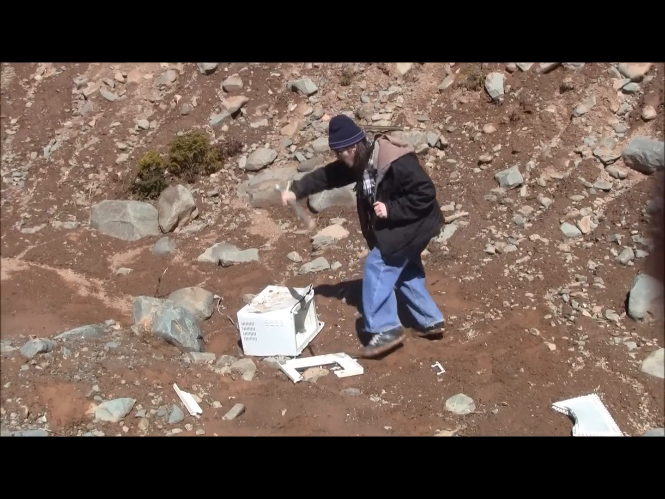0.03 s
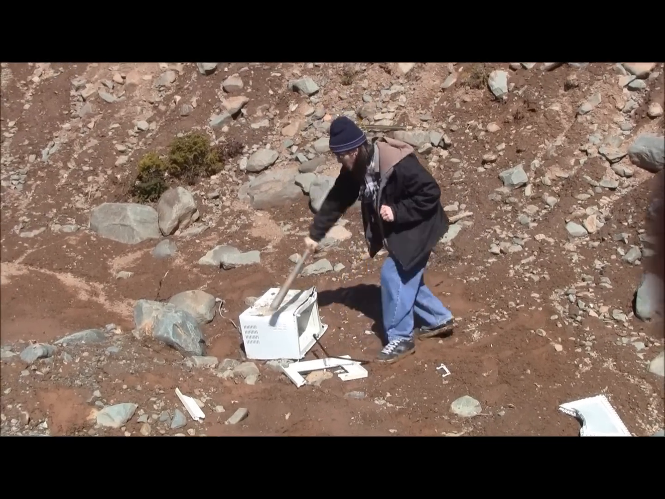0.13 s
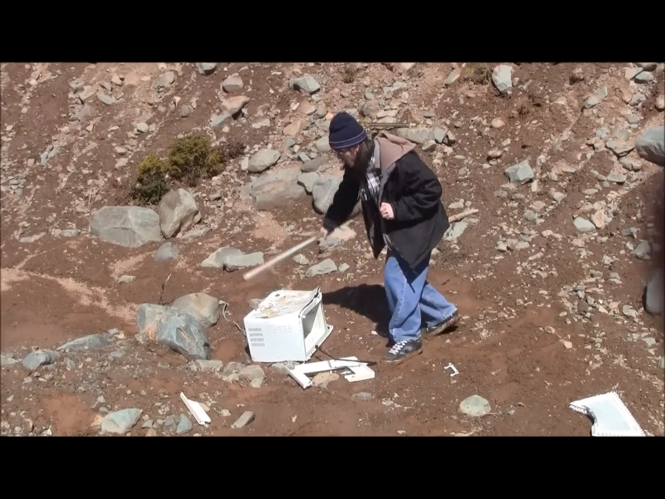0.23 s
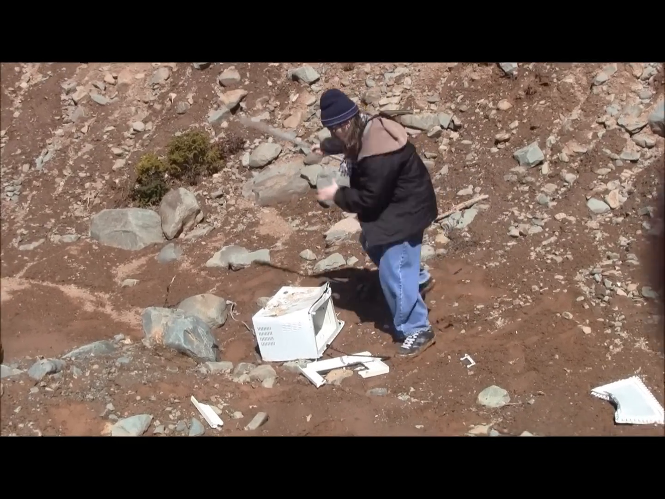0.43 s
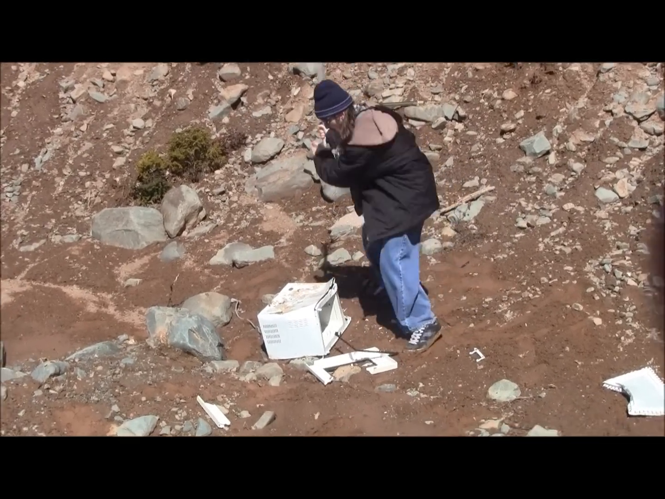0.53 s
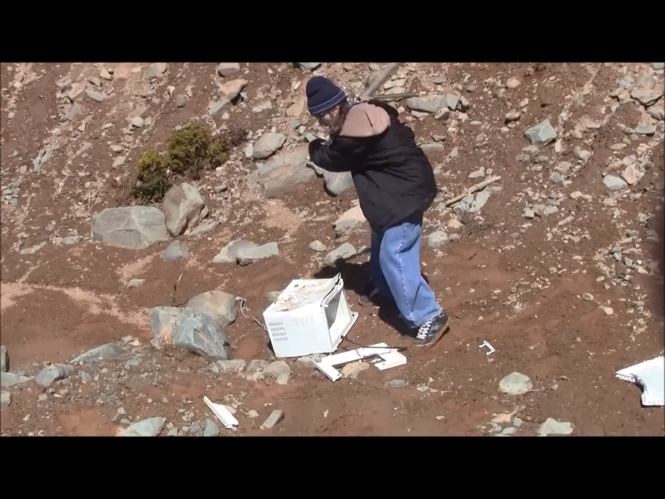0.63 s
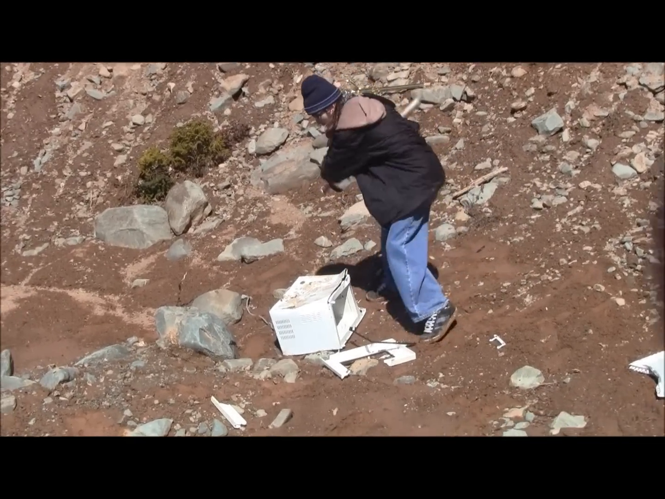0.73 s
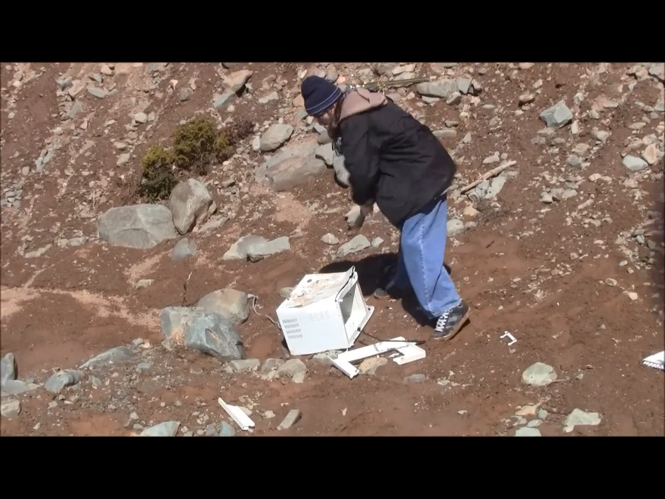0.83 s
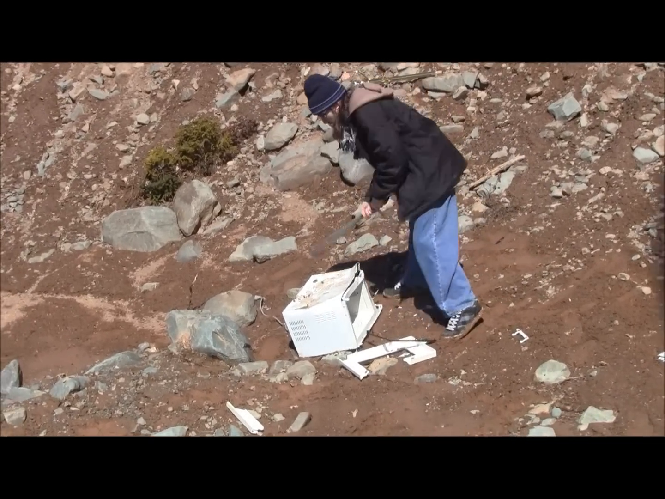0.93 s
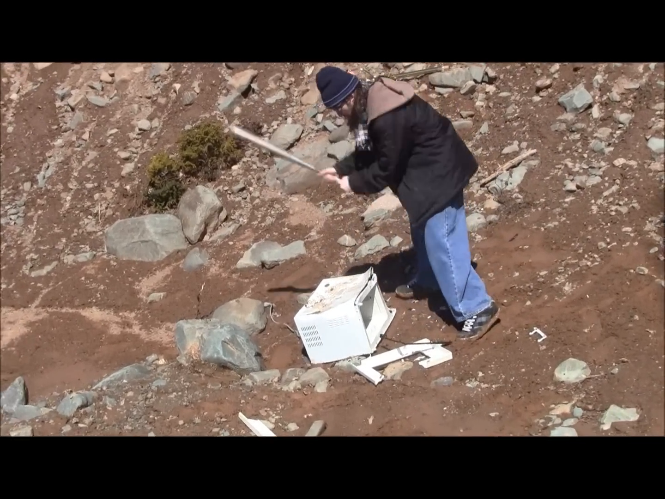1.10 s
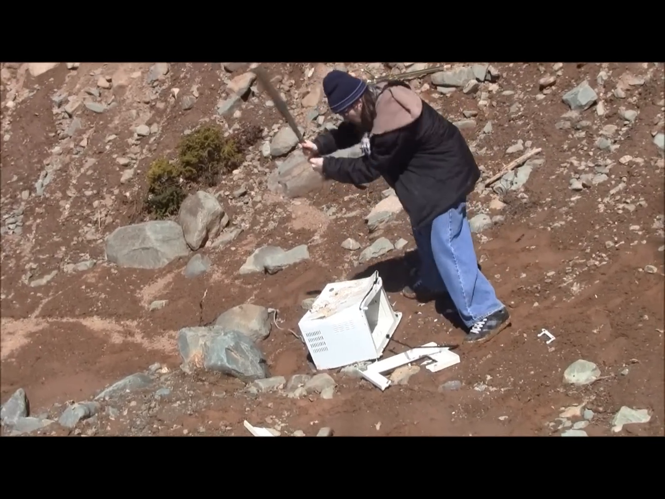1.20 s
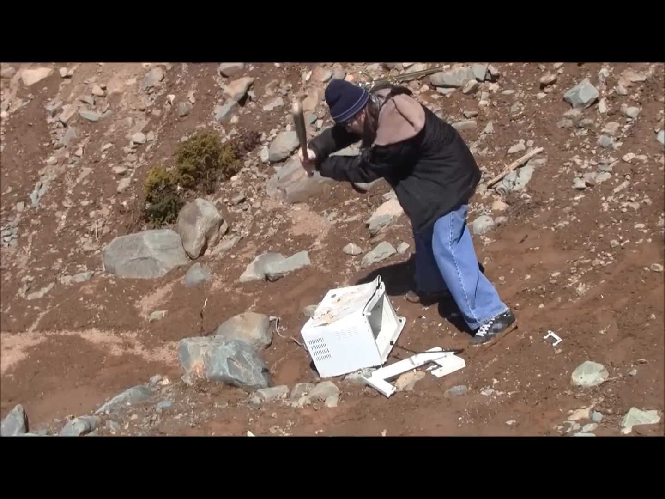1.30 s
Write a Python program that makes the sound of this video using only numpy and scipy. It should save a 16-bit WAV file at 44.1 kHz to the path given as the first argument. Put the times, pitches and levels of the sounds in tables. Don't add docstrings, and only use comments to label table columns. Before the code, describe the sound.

A hammer hits a hollow sheet-metal casing twice on open rocky ground, miked close. Boots scuff gravel and a stone knocks at 0.1 s. At 0.2 s a dull, clipped clang crashes with quick rebounds; the casing booms and rocks until about 0.45 s, then faint gravel and air. At 0.93 s a sharper crack booms and rattles, small parts tinkling from 1.02 s, fading by 1.35 s with another scuff at 1.25 s.

```python
import sys
import numpy as np
from scipy import signal
from scipy.io import wavfile

SR = 44100
rng = np.random.default_rng(int(sys.argv[2]) if len(sys.argv) > 2 else 0)


def boost_factor(decibels):
    exponent = np.asarray(decibels, float) / 20
    return 10 ** exponent


def wrap_up_sound(samples):
    columns = np.atleast_2d(samples).T
    tamed = np.clip(columns, -1, 1)
    steps = np.round(tamed * 32767).astype(np.int16)
    wavfile.write(sys.argv[1], SR, steps)


N = 59535

# (frequency [Hz], density [dB per Hz])
AIR_SPECTRUM = [(25, -33), (100, -12.5), (270, -2), (900, -5), (1300, -5.5), (3200, -21.5), (9700, -34.5),
                (13000, -25.5), (16000, -79)]
AIR_DB = -48.5
# (frequency [Hz], side minus mid [dB])
NEAR_SIDE = [(60, -38), (240, -11), (950, -19.5), (3770, -24), (6500, -17), (9000, -10), (15000, -2)]
AIR_SIDE = [(60, -33), (240, -5.5), (950, -7.5), (3770, -10), (15000, -9)]
LEFT_DB = -1.28

# (time [s], rise [s], t60 [s], level [dB], tilt [dB per octave])
SCUFFS = [(0.0, 0.0011, 0.068, -52, -1.5), (0.068, .004, .1, -50, 4), (0.129, .003, 0.23, -41.5, -1),
          (0.168, .006, 0.037, -50, -2), (0.187, 0.00091, 0.024, -49, -4), (0.379, 0.0022, 0.13, -47, 3),
          (0.438, 0.03, 0.2, -51, 6), (0.615, 0.015, 0.092, -53.5, 2.5), (0.657, .001, .02, -53, -4),
          (0.745, .01, 0.065, -61.5, 9), (0.850, .003, 0.75, -57.5, 4.5), (0.863, .006, .05, -62, -1),
          (1.2538, 0.0038, 0.15, -44, -3.5)]
# (frequency [Hz], density [dB per Hz])
GRAVEL_SPECTRUM = [(500, 0), (1200, 1), (3000, 0), (6000, -12.5), (9500, -7.5), (13000, -22.5),
                   (16000, -39)]
GRAINS_PER_S, GRAIN_SPREAD_DB = 12000, 2
# (frequency [Hz], density [dB per Hz])
STONE_SPECTRUM = [(88, -9), (150, -5.5), (923, -13), (1390, -0.5), (1870, -8), (4320, -6.5), (6910, -17),
                  (8900, -7), (16000, -41)]
STONE_S, STONE_DB, STONE_T60_S = 0.0958, -23.5, 0.042
STONE_HZ = (614, 1360, 3300, 4300, 8590, 8980)
STONE_RING_DB, STONE_RING_T60_S = -34, 0.045

# (time [s], wall boom [dB], rattle [dB], base boom [dB])
ROCK_ONE = [
    (0.209, -42, -26, -38),
    (0.252, -35.5, -38, -47),
    (0.293, -24.5, -40.5, -27),
    (0.336, -32.5, -44.5, -30),
    (0.378, -36, -60, -54),
    (0.418, -47.5, -60, -35),
    (0.552, -53.5, -64, -56),
    (0.662, -62, -61.5, -85),
]
ROCK_TWO = [
    (0.944, -41, -30.5, -44),
    (1.001, -26.5, -45, -38),
    (1.05, -33, -37, -30.5),
    (1.07, -31.5, -38, -21),
    (1.099, -31, -38.5, -46.5),
    (1.153, -39.5, -44.5, -28),
    (1.18, -44.5, -49, -42),
    (1.25, -45, -61.5, -48),
    (1.35, -63, -86, -59),
]
# (frequency [Hz], level [dB], t60 [s])
WALL_MODES = [(433, 0, 0.055), (452.6, -7.5, 0.117), (502, 5.5, 0.054), (558, -4.5, 0.17),
              (588.5, 2.5, 0.047), (657, -4, 0.2), (721.5, -3.5, 0.063), (848, -7.5, 0.038)]
# (frequency [Hz], level [dB], t60 [s])
BASE_MODES = [(121, -6, 0.3), (178, 0.5, 0.065), (241, -3, 0.16)]
WALL_DB, BASE_DB = -2.5, -8
KNOCKS_PER_S, KNOCK_SPREAD_DB = 500, 2
# (time [s], level [dB], frequency [Hz], t60 [s], share sharp at first [1])
LANDINGS = [(.286, -22, 520, .12, 0), (.316, -27, 505, .1, 0), (.336, -24, 516, .24, .09),
            (.422, -40, 515, .7, 0), (.983, -23, 710, .07, 0), (1.015, -23, 580, .08, 0),
            (1.059, -24, 595, .09, 0), (1.058, -26, 500, .1, 0), (1.08, -29, 450, .15, 0),
            (1.13, -29, 520, .1, 0), (1.146, -27, 535, .12, 0), (1.205, -37, 540, .1, 0),
            (1.235, -42, 575, .45, 0), (.208, -26, 213, .2, 0), (.932, -25, 185, .15, 0),
            (.972, -27, 226, .25, 0), (1.03, -25, 219, .25, 0), (1.085, -30, 204, .15, 0)]
LANDING_RISE_S, SAG_S = 0.0049, .03
# (time [s], level [dB])
SETTLES = [
    (.298, -34),
    (1.117, -36),
]
PAIR_HZ, BEAT_HZ, PAIR_T60_S = 207, 9.8, 1.2
# (frequency [Hz], density [dB per Hz])
RATTLE_SPECTRUM = [(410, -55), (700, -43), (882, 8), (4060, -4.5), (4380, -6), (6860, -13.5), (7800, -5),
                   (15000, -29)]
RATTLE_DB, RATTLE_CLICKS_PER_S, RATTLE_SPREAD_DB = 6, 7000, 2
SCREW_HZ = (3650, 3700, 4320, 4400, 4460, 5040, 5910, 6340, 9190, 9700)
SCREW_T60_S, SCREW_HITS_PER_S, SCREW_DB = .07, 110, -13
# (time [s], frequency [Hz], level [dB], t60 [s])
TINKLES = [(1.024, 7600, -41, .07), (1.044, 9700, -42, .05), (1.072, 9190, -42, .07),
           (1.070, 4450, -35, .09), (1.09, 5040, -40, .08), (1.075, 7690, -32, .11),
           (1.088, 5910, -44, .12), (1.100, 11900, -49, .08), (1.139, 7800, -41, .035),
           (1.140, 9600, -44, .08), (1.160, 7850, -48, .04), (1.162, 3680, -46, .14),
           (1.095, 3690, -42, .12), (1.307, 4300, -64, .12), (1.02, 4410, -43, .15),
           (1.045, 4400, -41, .12), (1.115, 4330, -44, .25)]
TINKLE_DB = 5

# (time [s], peak [dB], clang [Hz], clang t60 [s], crack [dB])
BLOWS = [
    (0.2047, 0, 1300, .015, -14),
    (0.9297, -1, 1520, .018, -6),
]
# (time [s], level [dB], clang [Hz],
# t60 [s])
REBOUNDS = [(0.2072, -6.5, 600, .03), (0.2096, -6.5, 1270, 0.017), (0.2053, -3, 1620, 0.022),
            (0.2134, -9.5, 636, 0.017), (0.223, -10, 1680, 0.03), (0.2253, -9.5, 580, 0.048),
            (0.2288, -12, 1080, 0.014), (0.2376, -9.5, 594, 0.01), (0.9289, -13, 850, .013),
            (0.9352, -15.5, 700, 0.011), (0.9449, -12, 1326, .015), (0.9610, -12, 690, 0.0099)]
# (frequency [Hz], level [dB], t60 [s])
PANEL_ONE = [(495, 2, .16), (556, -4, .3), (655, 1, .17), (945, -8, .15), (1110, -7, .2), (1265, -1, .1),
             (1455, 0, .1), (1545, -1, .09), (1705, 2, .14), (1840, -5, .2), (2030, -12, .1),
             (2153, -5, .09), (2444, -10, .15), (2910, -12, .12)]
# (frequency [Hz], level [dB], t60 [s])
PANEL_TWO = [(465, 4.5, 0.11), (530, -9, 0.16), (742, -6.5, 0.22), (820, -2, 0.17), (1023, -14.5, 0.25),
             (1283, -4, 0.18), (1420, -3, 0.2), (1725, 9.5, 0.055), (2105, -4, .08), (2226, -2, 0.084),
             (2342, -22, 0.049), (2800, -9, 0.13), (3430, 1.5, 0.027), (4312, -22, 0.18)]
# (frequency [Hz], density [dB per Hz])
CRASH_SPECTRUM = [(60, -53), (230, -15.5), (370, -12), (560, -2.5), (1500, 1), (3000, -4), (10400, -17.5),
                  (16000, -35)]
# (frequency [Hz], t60 [s])
CRASH_T60 = [(60, 0.3), (300, 0.79), (1000, 0.5), (3000, 0.22), (8000, 0.071), (15000, 0.25)]
PANEL_DB, CRASH_DB, CRACK_T60_S = -19.5, -18, .017

LOW_CUT_HZ, HIGH_CUT_HZ = 185, 16000
OVERLOAD_LEVEL = 1.0


def rms_one(x):
    return x / np.sqrt(np.mean(x ** 2) + 1e-20)


def at_hz(points, hz):
    table_hz, values = np.array(points).T
    return np.interp(np.log(hz), np.log(table_hz), values)


def burst(s, rise, t60):
    t = np.arange(N) / SR - s
    return np.clip(t / rise, 0, 1) * boost_factor(-60 * np.maximum(t - rise, 0) / t60)


def ring(s, hz, t60):
    t = np.maximum(np.arange(N) / SR - s, 0)
    return np.sin(2 * np.pi * hz * t) * np.exp(-np.log(1000) * t / t60)


def grains(rate, spread_db):
    size = boost_factor(spread_db * np.minimum(rng.exponential(1, N), 5)) * rng.choice([-1, 1], N)
    return rms_one(size * (rng.random(N) < rate / SR) + 1e-18)


def twin(clicks):
    return clicks * rng.choice([-1, 1], (2, N))


def hiss():
    return rng.standard_normal((2, N))


def colour(source, spectrum, width, shape=lambda hz: 1):
    out, power = 0, 0
    edges = 30 * 2 ** np.arange(0, 9.2, 1 / 3)
    side = source * rng.choice([-1, 1], source.shape)
    for k, (low, high) in enumerate(zip(edges, edges[1:])):
        hz = np.sqrt(low * high)
        gain = boost_factor(at_hz(spectrum, hz)) * (spectrum[0][0] < high)
        band = signal.butter(2, [low, high], "band", fs=SR, output="sos")
        mid, odd = gain * signal.sosfilt(band, [source[k % 2], side[k % 2]])
        power += np.mean(mid ** 2)
        left_right = mid + boost_factor(at_hz(width, hz)) * odd * np.array([[1], [-1]])
        out = out + shape(hz) * left_right
    return out / np.sqrt(power)


def knocked(modes, drive, rate):
    out = 0
    for hz, db, t60 in modes:
        r, w = boost_factor(-60 / (t60 * SR)), 2 * np.pi * hz / SR
        knocks = np.sin(w) * drive * grains(rate, KNOCK_SPREAD_DB)
        ringing = signal.lfilter([0, 1], [1, -2 * r * np.cos(w), r * r], knocks)
        out = out + boost_factor(db) * np.sqrt(1 - r) * ringing
    return out


def distant_air():
    return boost_factor(AIR_DB) * colour(hiss(), AIR_SPECTRUM, AIR_SIDE)


def gravel():
    def steps(hz):
        return sum(boost_factor(db + tilt * np.log2(hz / 4000)) * burst(s, rise, t60)
                   for s, rise, t60, db, tilt in SCUFFS)
    return colour(twin(grains(GRAINS_PER_S, GRAIN_SPREAD_DB)), GRAVEL_SPECTRUM, AIR_SIDE, steps)


def stone():
    tail = boost_factor(-20.5) * burst(STONE_S + 0.0097, 0.001, 0.19)
    knock = boost_factor(STONE_DB) * (burst(STONE_S, 0.00018, STONE_T60_S) + tail)
    notes = sum(ring(STONE_S + 0.000531, hz, STONE_RING_T60_S) for hz in STONE_HZ)
    return boost_factor(STONE_RING_DB) * notes + knock * colour(hiss(), STONE_SPECTRUM, NEAR_SIDE)


def rocking(column):
    t, out = np.arange(N) / SR, 0
    for rows in (np.array(ROCK_ONE), np.array(ROCK_TWO)):
        out = out + boost_factor(np.interp(t, rows[:, 0], rows[:, column], left=-120, right=-120))
    return out


def landing(s, hz, t60, sharp):
    t = np.maximum(np.arange(N) / SR - s, 0)
    cycles = hz * (t + sharp * SAG_S * (1 - np.exp(-t / SAG_S)))
    return np.sin(2 * np.pi * cycles) * burst(s, LANDING_RISE_S, t60)


def casing_boom():
    walls = boost_factor(WALL_DB) * knocked(WALL_MODES, rocking(column=1), KNOCKS_PER_S)
    base = boost_factor(BASE_DB) * knocked(BASE_MODES, rocking(column=3), KNOCKS_PER_S)
    landings = sum(boost_factor(db) * landing(s, *row) for s, db, *row in LANDINGS)
    settling = sum(boost_factor(db) * ring(s, PAIR_HZ, PAIR_T60_S) * ring(s, BEAT_HZ / 2, np.inf)
                   for s, db in SETTLES)
    return walls + base + landings + settling


def seam_rattle():
    clicks = grains(RATTLE_CLICKS_PER_S, RATTLE_SPREAD_DB)
    return boost_factor(RATTLE_DB) * rocking(column=2) * colour(twin(clicks), RATTLE_SPECTRUM, NEAR_SIDE)


def screws():
    loose = rocking(column=2) * (np.arange(N) / SR > TINKLES[0][0] - .02)
    return knocked([(hz, SCREW_DB, SCREW_T60_S) for hz in SCREW_HZ], loose, SCREW_HITS_PER_S)


def tinkles():
    out = 0
    for s, hz, db, t60 in TINKLES:
        beat_hz = rng.uniform(60, 140)
        wobble = 1 + .3 * np.cos(2 * np.pi * beat_hz * np.arange(N) / SR)
        out = out + boost_factor(db) * ring(s, hz, t60) * burst(s, 0.0025, 1.4) * wobble
    return boost_factor(TINKLE_DB) * out


def clangs():
    hits = sum(-boost_factor(db) * ring(s, hz, t60) for s, db, hz, t60, _ in BLOWS)
    return hits + sum(boost_factor(db) * ring(s, hz, t60) for s, db, hz, t60 in REBOUNDS)


def panel():
    out = 0
    for (s, *_), modes in zip(BLOWS, (PANEL_ONE, PANEL_TWO)):
        for hz, db, t60 in modes:
            out = out + boost_factor(PANEL_DB + db) * ring(s + rng.uniform(0, 0.004066), hz, t60)
    return out


def crash():
    def dying(hz):
        out = 0
        for s, *_, crack_db in BLOWS:
            out = out + boost_factor(CRASH_DB) * burst(s, 0.00015, at_hz(CRASH_T60, hz))
            out = out + boost_factor(crack_db) * burst(s - .0007, 0.0007, CRACK_T60_S)
        return out
    return colour(hiss(), CRASH_SPECTRUM, NEAR_SIDE, dying)


def scene():
    ground = gravel() + stone()
    casing = casing_boom() + seam_rattle() + screws() + tinkles()
    blows = clangs() + panel() + crash()
    low_cut = signal.butter(3, LOW_CUT_HZ, "high", fs=SR, output="sos")
    near = signal.sosfilt(low_cut, ground + casing + blows)
    return (distant_air() + near) * boost_factor(np.array([[LEFT_DB / 2], [-LEFT_DB / 2]]))


def roll_off(x):
    return signal.sosfilt(signal.butter(12, 16310, fs=SR, output="sos"), x)


def record(dry):
    x = signal.sosfilt(signal.butter(8, HIGH_CUT_HZ, fs=SR, output="sos"), dry)
    x = x / (1 + np.abs(x / OVERLOAD_LEVEL) ** 8) ** (1 / 8)
    return roll_off(x)


dry = scene()
out = record(dry)
wrap_up_sound(out)
```